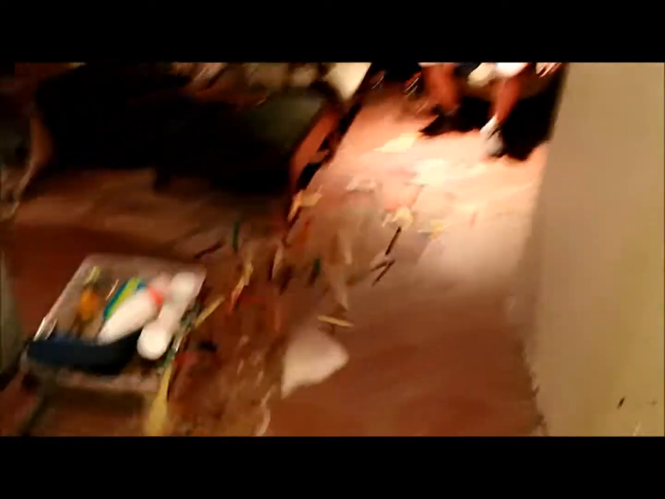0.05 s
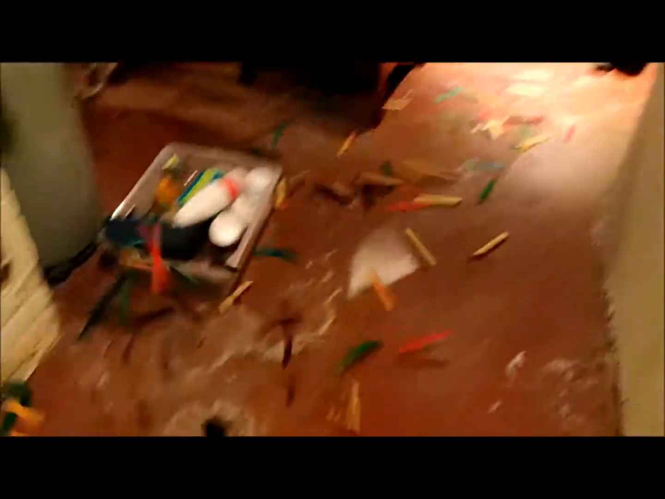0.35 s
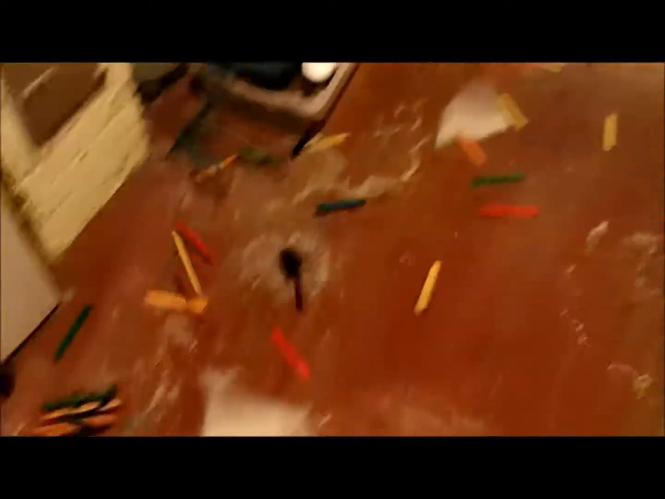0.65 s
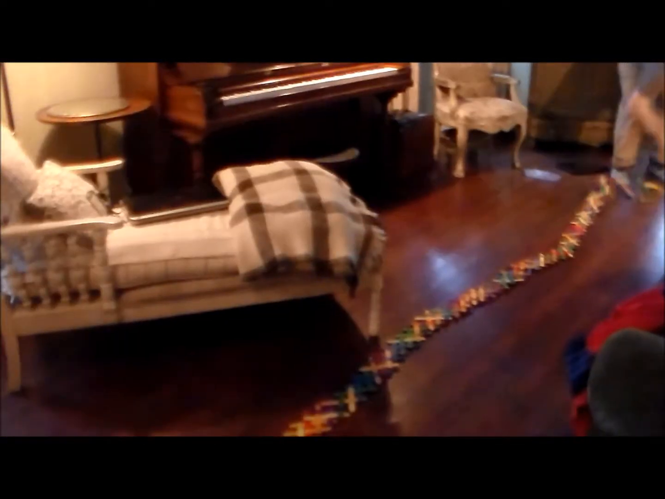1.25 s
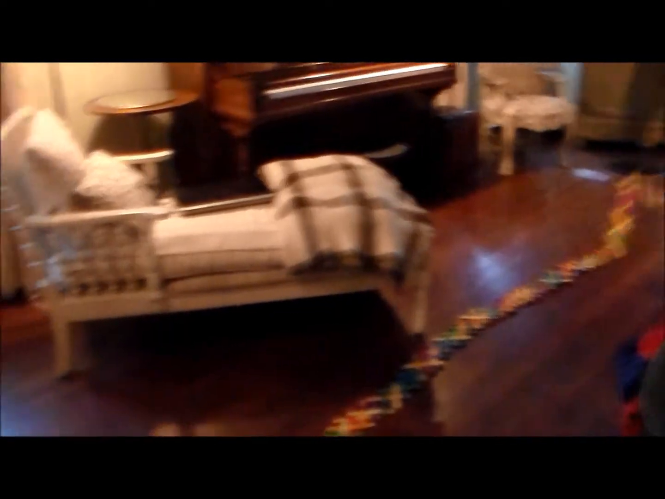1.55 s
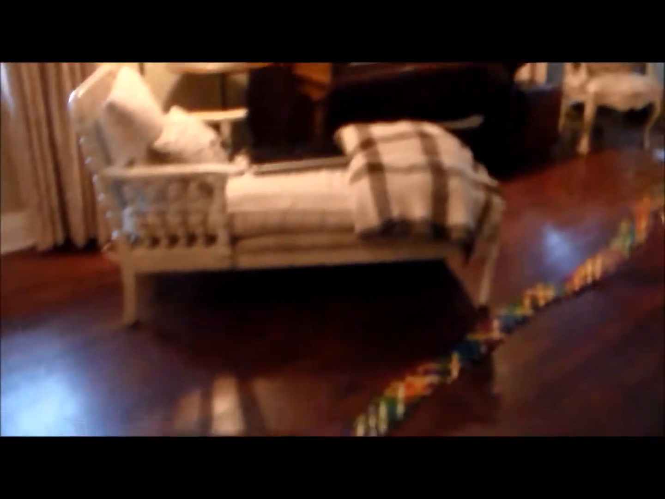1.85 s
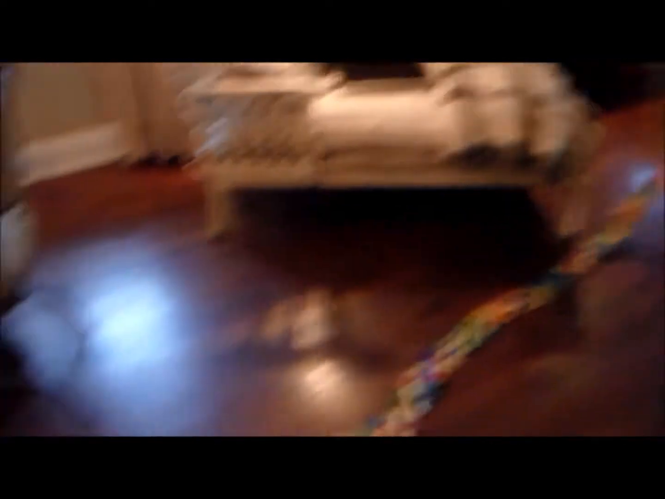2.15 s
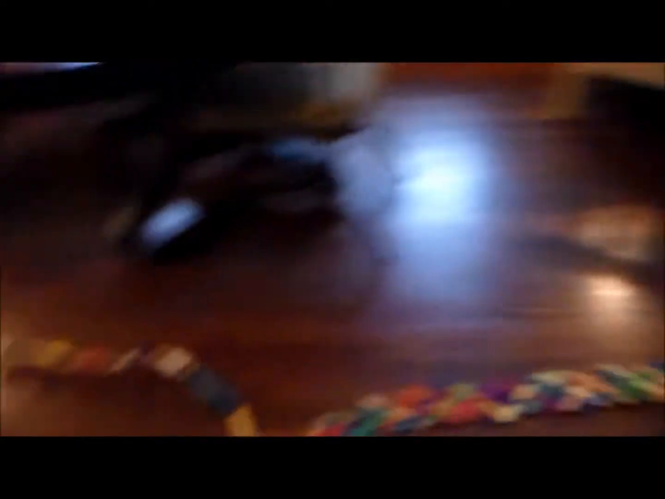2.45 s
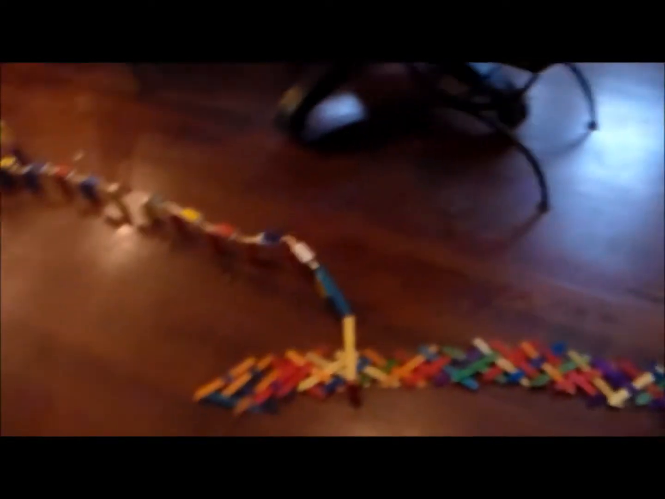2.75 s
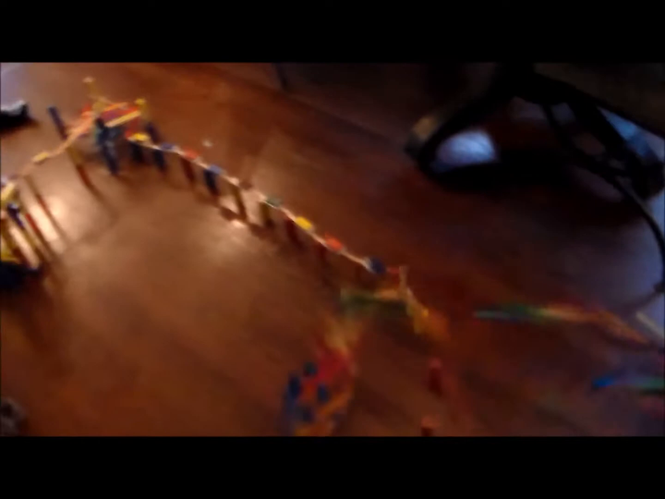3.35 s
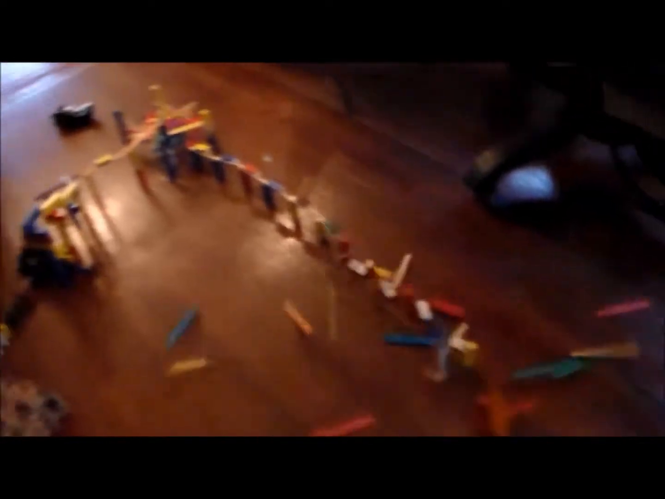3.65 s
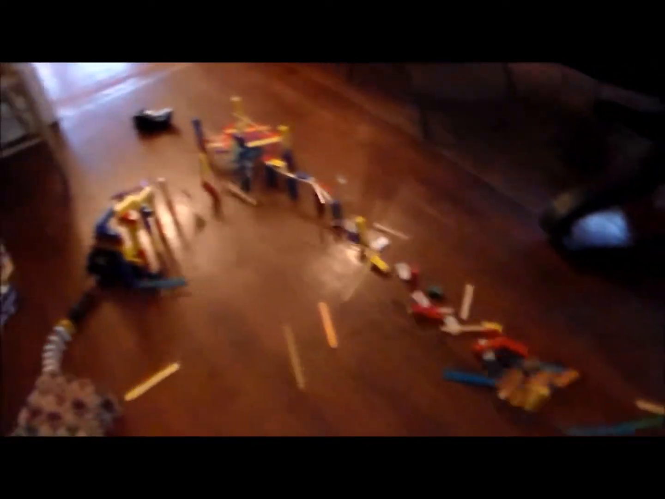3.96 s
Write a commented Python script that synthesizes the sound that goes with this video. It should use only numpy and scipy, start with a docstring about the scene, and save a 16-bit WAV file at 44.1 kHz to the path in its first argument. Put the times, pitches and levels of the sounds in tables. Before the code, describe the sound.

Wooden craft stick chains fly apart, snapping and clattering densely onto a wooden floor.

```python
"""Stick chains flying apart

Woven chains of wooden craft sticks let go indoors; each impact excites a stick's bending and twisting
modes. Close by, loose sticks rain on a hard floor, two hollow knocks sound and a clump crashes down.
After an abrupt cut to a quiet living room a second chain runs: sticks snap free, clatter on the
floorboards and set them ringing, and at the end small hard pieces clink."""
import sys
import numpy as np
from scipy import signal
from scipy.fft import rfft, irfft
from scipy.io import wavfile

SR = 44100
rng = np.random.default_rng(int(sys.argv[2]) if len(sys.argv) > 2 else 0)


def pcm_store(signal):
    """Save signal as 16-bit PCM."""
    levels = np.round(np.clip(np.atleast_2d(signal), -1, 1) * 32767)
    wavfile.write(sys.argv[1], SR, levels.astype(np.int16).T)


N = 176400
CUT_S = 0.935  # the close shower ends and the living room begins


# Nominal bending and twisting modes of a stick: f/Hz, level/dB
STICK_MODES = [(760, -9), (2050, -9.5), (3300, -2.5), (4100, 2), (4900, -2), (6100, -3.5), (7400, 4),
               (9100, 0), (10800, -0.5), (12400, -3.5), (14000, 3.5)]

def sticks(typical_t60, crack_db, count=96, size=2048):
    """Modal superposition: an impact gives a crack and damped modes weighted by the contact point."""
    pitch_spread, crack_decay_s = .11, .00068
    t = np.arange(size) / SR
    hz, db = np.array(STICK_MODES).T
    handful = []
    for _ in range(count):
        detuning = rng.standard_normal() + .5 * rng.standard_normal(len(hz))  # whole stick + each mode
        mode_hz = hz * np.exp(pitch_spread * detuning)
        weight = undb(db) * rng.standard_normal(len(hz)) * (mode_hz < SR / 2)
        t60 = typical_t60 * np.exp(.5 * rng.standard_normal())
        ring = weight @ np.sin(2 * np.pi * mode_hz[:, None] * t) * fade(t, t60)
        crack = rng.standard_normal(size) * np.exp(-t / crack_decay_s)
        handful.append(burst(burst(ring) + undb(crack_db) * burst(crack)))
    return np.array(handful)


def clatter(handful, start, end, range_db, count):
    """Incoherent sum: random impacts, a few hard and most soft, with rms 1 over their span."""
    out = np.zeros((2, N))
    for k, (jitter, which, softness) in enumerate(rng.random((count, 3))):
        onset = start + (end - start) * (k + 2 * jitter) / (count + 1)
        stick = handful[int(which * len(handful))]
        add(out, onset, stick * undb(-range_db * np.sqrt(softness)))
    return out / np.sqrt(np.sum(out[0] ** 2) / ((end - start) * SR))


def strikes(handful, table, contacts=5):
    """Inelastic rebound: each hit chatters in a series of ever weaker contacts."""
    out = np.zeros((2, N))
    for start, db, chatter_s in table:
        hit = np.zeros(SR // 8)
        for k, (jitter, which) in enumerate(rng.random((contacts, 2))):
            i = int(np.clip(chatter_s * (k - jitter) / (contacts - 1), 0, .05) * SR)
            hit[i:i + handful.shape[1]] += .78 ** k * handful[int(which * len(handful))]
        add(out, start, undb(db) * burst(hit))
    return out


# Envelope of the running chain: t/s, snapping level/dB, landing level/dB
CHAIN_LEVELS = [(1.23, -44, -55), (1.28, -29, -44), (1.34, -36, -54), (1.41, -29.5, -34.5),
                (1.54, -33, -42.5), (1.67, -27, -37), (3.03, -29.5, -39.5), (4.0, -28, -33)]
# Envelope of the floorboards' low ring: t/s, level/dB
BOOM_LEVEL = [(1.23, -63), (1.49, -50.5), (4.0, -41)]
# Sharp snaps in the weave and flat slaps on the boards: t/s, level/dB, chatter length/s
SHARP_SNAPS = [(1.269, -21, .010), (1.292, -26.5, 0.0041), (1.362, -24, 0.005), (1.429, -28, .005),
               (2.139, -31, 0.0013), (2.163, -21.5, 0.0066), (2.299, -32, .004), (2.460, -21.5, .001),
               (3.435, -29.5, 0.0047), (3.459, -26, 0.0025), (3.606, -37, .006), (3.867, -27, 0.0047),
               (3.893, -38, .004)]
FLAT_SLAPS = [(1.409, -29.5, 0.0035), (1.645, -23, 0.0042), (1.688, -24.5, 0.0036), (1.747, -22.5, 0.0015),
              (1.963, -26.5, 0.0084), (2.132, -27, .002), (2.218, -24, 0.0027), (2.438, -21.5, 0.0081),
              (2.665, -27.5, 0.0031), (2.765, -34, 0.0042), (3.064, -32, 0.00216), (3.537, -26, 0.0024),
              (3.641, -27, 0.0018), (3.744, -28, .002), (3.925, -37, 0.0019)]
# Responses that shape the snaps, the landings and the low ring: f/Hz, level/dB
SNAP_RESPONSE = [(300, -25), (1500, -6.5), (3000, -1.5), (3900, -1.5), (5200, 0), (8000, -1), (10000, 0),
                 (12000, -1.5), (14000, -4)]
BOARD_RESPONSE = [(100, -34.5), (400, -9), (800, -2), (1500, 2), (2500, -1), (4000, -11.5), (7000, -14),
                  (14000, -33)]
BOOM_RESPONSE = [(60, -25), (105, -9.5), (140, -3), (200, 1), (350, 3), (520, 2), (900, -17.5), (4000, -50)]

def chain(handful):
    """Release of elastic energy: sticks spring from the weave, hit the boards and set them ringing."""
    span = CHAIN_LEVELS[0][0], N / SR
    snaps = clatter(handful, *span, range_db=20.5, count=1700) * curve(CHAIN_LEVELS) * undb(.5)
    snaps += strikes(handful, SHARP_SNAPS)
    falls = clatter(handful, *span, range_db=18.5, count=800) * curve(CHAIN_LEVELS, column=2) * undb(2.5)
    falls += strikes(handful, FLAT_SLAPS)
    boom = clatter(handful, *span, range_db=17, count=500) * curve(BOOM_LEVEL) * undb(1)
    return colour(snaps, SNAP_RESPONSE) + colour(falls, BOARD_RESPONSE) + colour(boom, BOOM_RESPONSE)


# Distinct close landings: t/s, level/dB, chatter length/s
CLOSE_LANDINGS = [(.003, -15, .016), (.044, -28, .005), (.0725, -14.5, .004), (.100, -11, .010),
                  (.123, -13.5, .005), (.1455, -11, .007), (.166, -18, .008), (.173, -13, .008),
                  (.186, -30, .005), (.263, -16.5, .003), (.286, -13, .004), (.305, -10, .008),
                  (.342, -10, .008), (.378, -11, .008), (.386, -9, .011), (.408, -12.5, .010),
                  (.434, -13.5, .005), (.475, -14, .002), (.490, -16.5, .006), (.513, -14, .002),
                  (.549, -22.5, .004), (.565, -14.5, .002), (.570, -8, .004), (.576, -20, .005),
                  (.635, -16, .009), (.650, -18.5, .005), (.7035, -12.5, .004), (.7475, -14.5, .004),
                  (.766, -16, .004), (.801, -18, .006), (.828, -17, .005), (.848, -17.5, .003),
                  (.861, -14, .006), (.886, -21.5, .002)]
# Envelope of the mass of lighter landings: t/s, level/dB
SHOWER_LEVEL = [(0.0, -16.5), (0.738, -24.5), (0.93, -49)]
# Response that shapes the landings on the hard floor: f/Hz, level/dB
SHOWER_RESPONSE = [(150, -44.5), (400, -26.5), (1000, -20.5), (2000, -11.5), (2900, -7), (3800, -3.5),
                   (6000, -0.5), (7600, -5), (9200, -1), (13500, -2), (15500, -6)]

def shower():
    """Impact noise: loose sticks rain on a hard floor, strong hits above a mass of light ones."""
    handful = sticks(typical_t60=.035, crack_db=-.5)
    light = clatter(handful, 0, CUT_S, range_db=11.5, count=520) * curve(SHOWER_LEVEL)
    strong = strikes(handful, CLOSE_LANDINGS)
    return colour((light + strong) * undb(-3.5), SHOWER_RESPONSE)


# Response that shapes the falling clump: f/Hz, level/dB
CRASH_RESPONSE = [(100, -31), (300, -12), (700, -2.5), (1400, 1.5), (2600, 3), (4300, 4.5), (6500, -0.5),
                  (9000, -18.5), (15000, -31)]

def crash(handful, start=.411):
    """Temporal fusion: a clump's impacts come so densely that they merge into one decaying crash."""
    t = np.arange(N) / SR - start
    settling = (t > 0) * fade(np.abs(t), t60=.4) * undb(-15)
    impacts = clatter(handful, start, start + .17, range_db=2.5, count=170)
    return colour(impacts * settling, CRASH_RESPONSE)


# Knocks on a hollow body: t/s, level/dB, frequency ratio
HOLLOW_KNOCKS = [(.085, -23, 1), (0.1507, -26.5, 1.45)]
# Its modes at ratio 1: f/Hz, level/dB, T60/s
HOLLOW_MODES = [(400, -22, .1), (762, 2.5, 0.13), (892, 4, 0.082), (1174, -1, 0.12), (1540, 0, 0.061)]

def knocks():
    """Free vibration: a hollow body struck by a stick rings in its damped modes."""
    out, t = np.zeros((2, N)), np.arange(SR // 4) / SR
    for start, db, ratio in HOLLOW_KNOCKS:
        ring = sum(undb(mode_db) * np.sin(2 * np.pi * hz * ratio * t) * fade(t, t60)
                   for hz, mode_db, t60 in HOLLOW_MODES)
        add(out, start, undb(db) * burst(ring))
    return out


# Collisions of small hard pieces: t/s, level/dB, centre f/Hz
PIECE_CLINKS = [(3.606, -28, 6650), (3.672, -25, 6600), (3.700, -37, 6900), (3.742, -38, 6650),
                (3.771, -26.5, 7050), (3.798, -26.5, 6950), (3.826, -29, 7000), (3.850, -29, 6800),
                (3.867, -30, 8000), (3.894, -29, 7050), (3.961, -31, 7050), (3.985, -27, 7000)]

def clinks(modes=4, spread=.021):
    """Beating: small hard pieces topple on each other and ring in closely spaced modes."""
    out, t = np.zeros((2, N)), np.arange(SR // 6) / SR
    for start, db, hz in PIECE_CLINKS:
        mode_hz = hz * (1 + spread * rng.standard_normal((modes, 1)))
        ring = np.sin(2 * np.pi * mode_hz * t).sum(axis=0) * fade(t, t60=.083)
        add(out, start, undb(db) * burst(ring))
    return out


def room(x, t60, wet_db):
    """Reverberation: a diffuse field builds up after the direct sound and decays exponentially."""
    t = np.arange(SR // 2) / SR
    build_up = 1 - np.exp(-t / .004)
    tail = rng.standard_normal((2, len(t))) * fade(t, t60) * build_up
    tail *= undb(wet_db) / np.sqrt(np.sum(tail[0] ** 2))
    diffuse = signal.fftconvolve(x[:1], tail, axes=1)[:, :N]
    return (x + diffuse) / np.sqrt(1 + undb(wet_db) ** 2)


# Spectrum of the living room's air and rumble: f/Hz, level/dB
AIR_SPECTRUM = [(20, 3), (58, -0.5), (100, -12.5), (200, -14), (400, -17), (1000, -23.5), (4000, -30.5),
                (14000, -36.5)]
# Its envelope: t/s, level/dB
AIR_LEVEL = [(.935, -52), (1.2, -49.5), (1.24, -45), (1.32, -58), (2, -58.5), (4, -64)]

def air():
    """Ambient noise: a faint random background, strongest in the bass."""
    return colour(rng.standard_normal((2, N)), AIR_SPECTRUM) * curve(AIR_LEVEL)


def undb(db):
    """Amplitude ratio of a level in decibels."""
    return 10 ** (np.asarray(db) / 20)


def fade(t, t60):
    """Exponential damping: 60 dB in t60 seconds."""
    return np.exp(-np.log(1000) * t / max(t60, 1e-3))


def curve(table, column=1):
    """Amplitude envelope from one dB column of a table; silent before its first row."""
    table = np.array(table)
    return undb(np.interp(np.arange(N) / SR, table[:, 0], table[:, column], left=-200))


def burst(x):
    """Energy normalisation to that of 10 ms at rms 1."""
    return x * np.sqrt(SR / 100 / np.sum(x ** 2))


def add(out, start, sound):
    """Mid-side panning: mix in a sound from a random direction."""
    i = int(np.clip(start * SR, 0, N - 1))
    part = sound[:N - i]
    side_gain = np.sqrt(3) * rng.uniform(-.73, 1)
    out[:, i:i + len(part)] += np.array([[1], [side_gain]]) * part


def colour(x, points, keep_power=True, size=4096):
    """Minimum-phase filtering through points of f/Hz, level/dB."""
    hz, db = np.array(points).T
    bin_hz = np.arange(size // 2 + 1) * SR / size
    gain = undb(np.interp(np.log(bin_hz + 1), np.log(hz), db))
    if keep_power:
        gain /= np.sqrt(np.mean(gain ** 2))
    cepstrum = irfft(np.log(gain))
    cepstrum[1:size // 2] *= 2  # folding onto positive time makes the filter causal
    cepstrum[size // 2 + 1:] = 0
    taps = irfft(np.exp(rfft(cepstrum)))
    return signal.fftconvolve(np.atleast_2d(x), taps[None], axes=1)[:, :N]


def lowpass(x, hz):
    """Band limiting by a steep elliptic filter."""
    return signal.sosfilt(signal.ellip(12, .2, 80, hz, fs=SR, output="sos"), x)


# Stereo width, as the gain of the side signal: f/Hz, level/dB
SIDE_RESPONSE = [(50, -2), (250, -34), (1000, -22.5), (2000, -21), (4000, -10), (8000, -4), (13000, -6)]

def scene():
    """Superposition in two rooms joined by a cut; mid plus and minus side gives left and right."""
    handful = sticks(typical_t60=.036, crack_db=2)
    close = room(shower() + knocks() + crash(handful), t60=.33, wet_db=-4)
    background = air()
    living_room = room(chain(handful) + clinks(), t60=.39, wet_db=-1)
    living_room = lowpass(living_room + background, hz=14250)
    mid, side = np.where(np.arange(N) / SR < CUT_S, close, living_room)
    return mid + np.array([[1], [-1]]) * colour(side, SIDE_RESPONSE, keep_power=False)


def record(dry):
    """Hard clipping at full scale, then band limiting."""
    return lowpass(np.clip(dry, -1, 1), hz=15700)


dry = scene()
out = record(dry)
pcm_store(out)
```